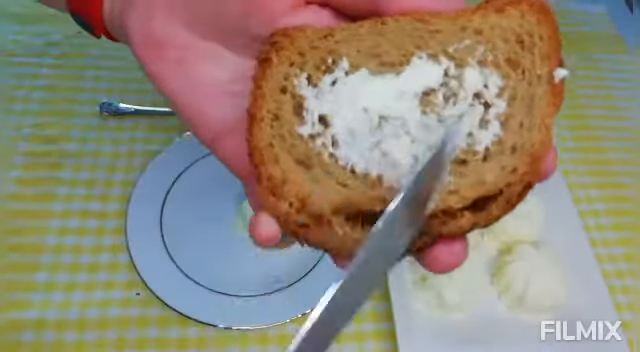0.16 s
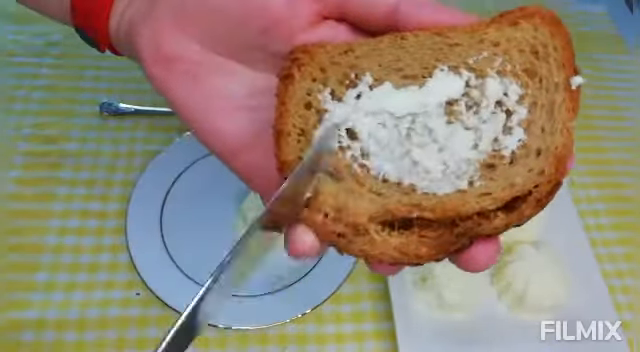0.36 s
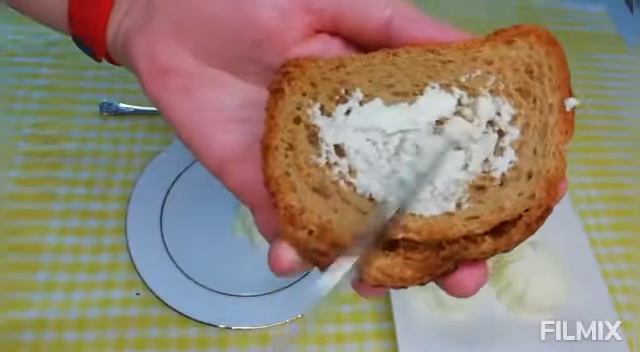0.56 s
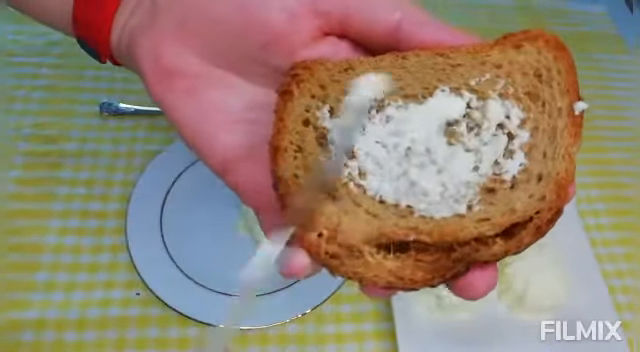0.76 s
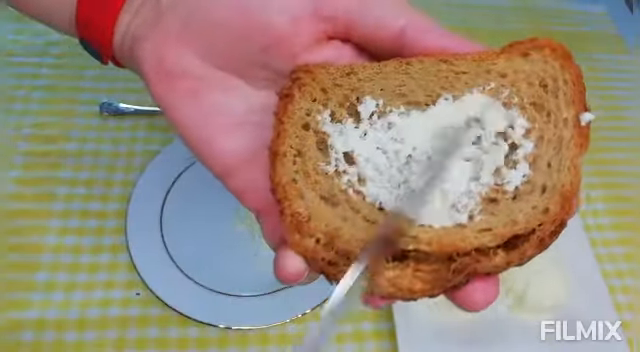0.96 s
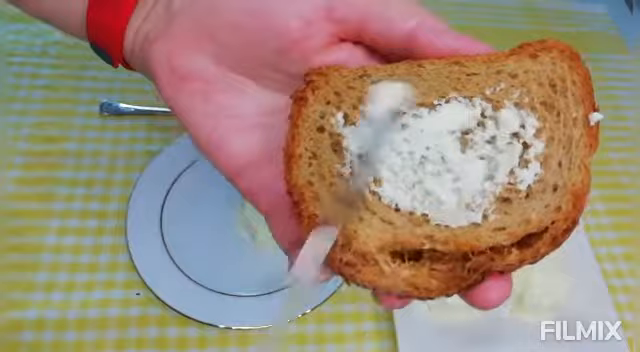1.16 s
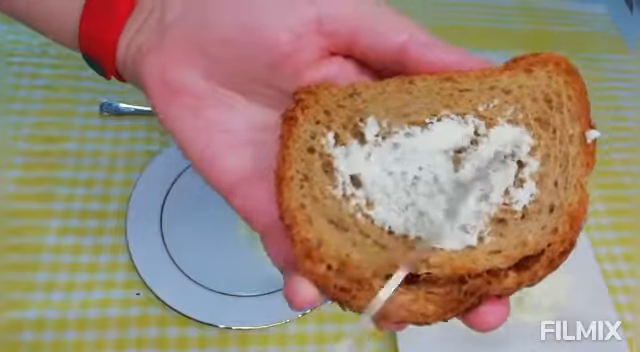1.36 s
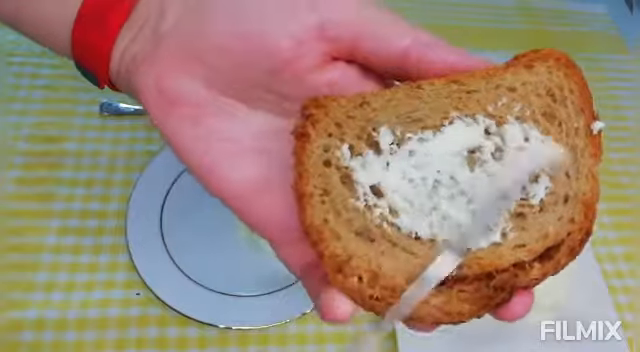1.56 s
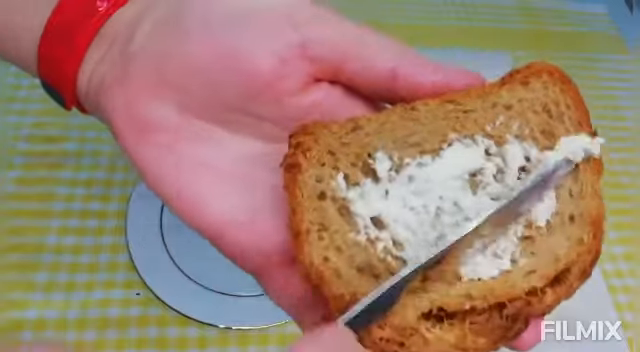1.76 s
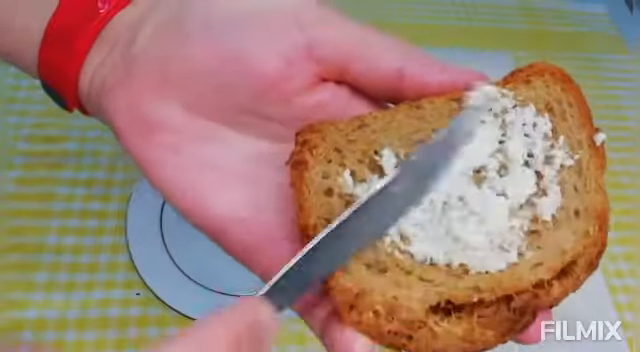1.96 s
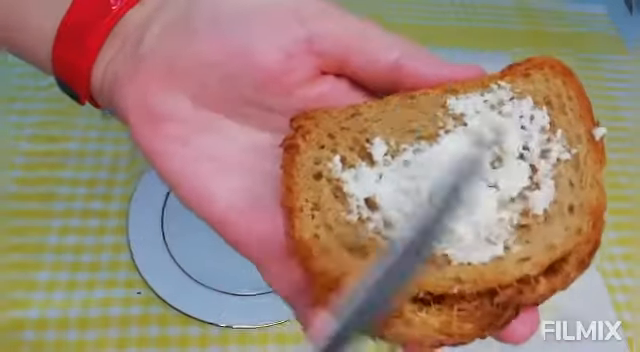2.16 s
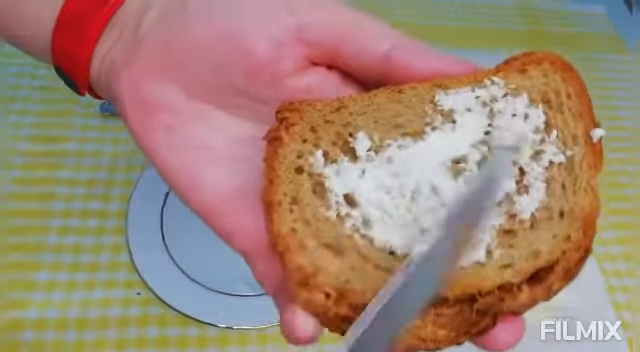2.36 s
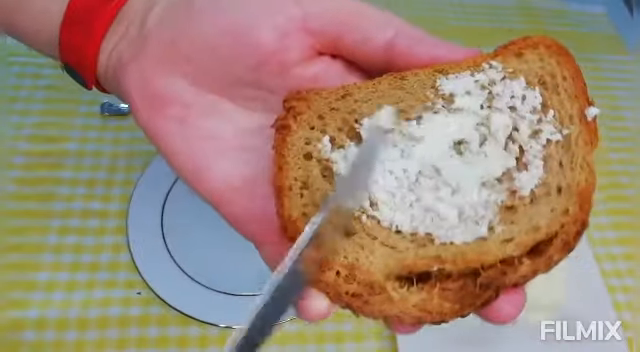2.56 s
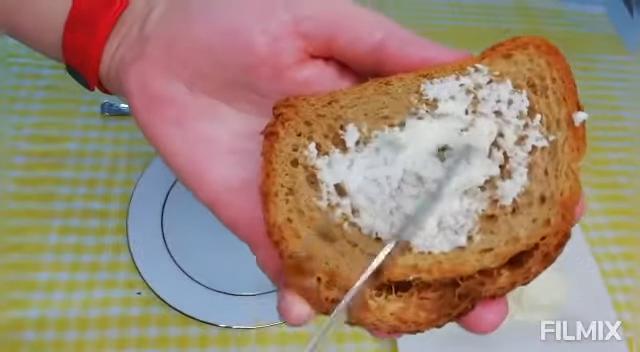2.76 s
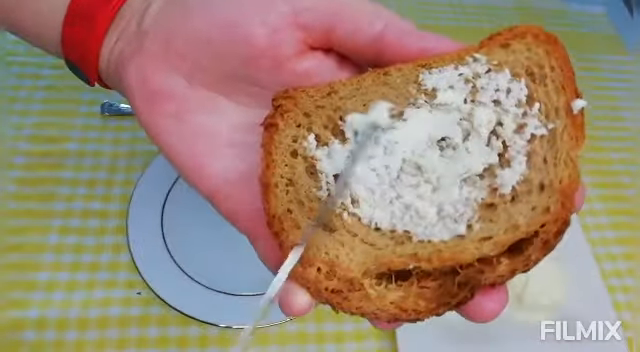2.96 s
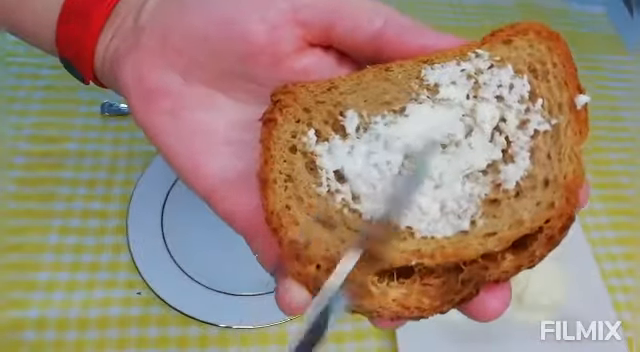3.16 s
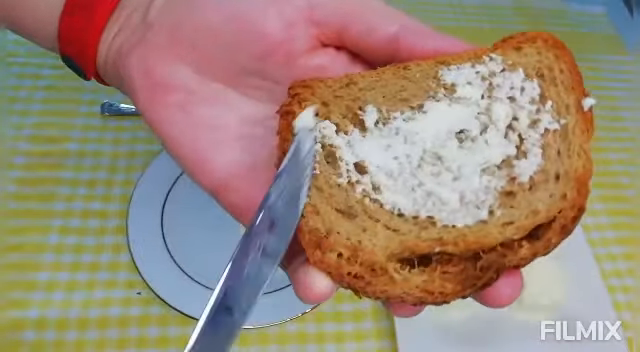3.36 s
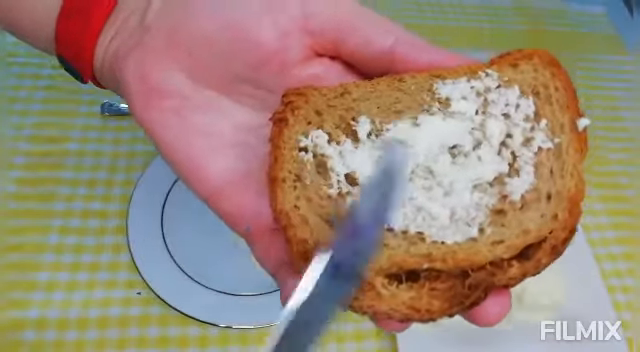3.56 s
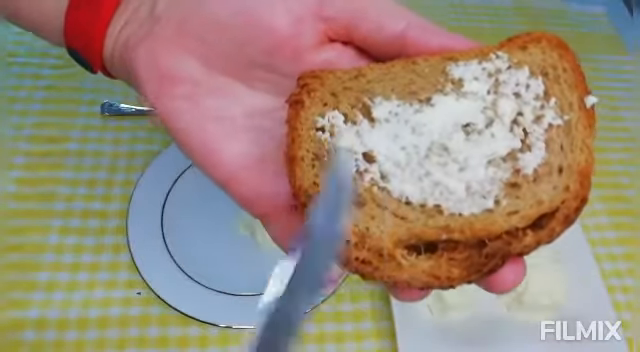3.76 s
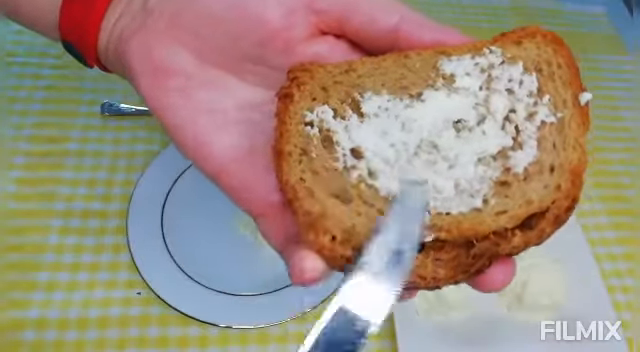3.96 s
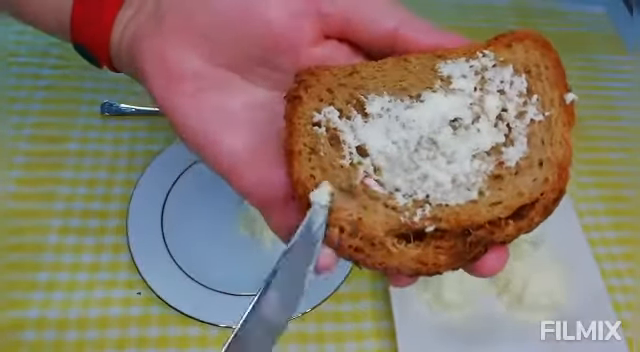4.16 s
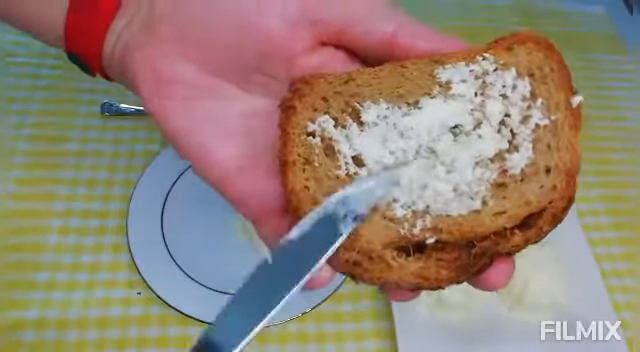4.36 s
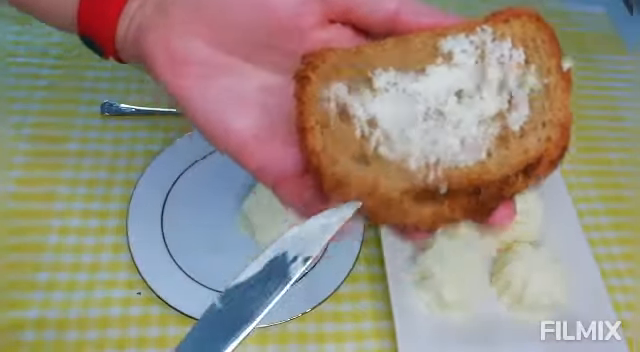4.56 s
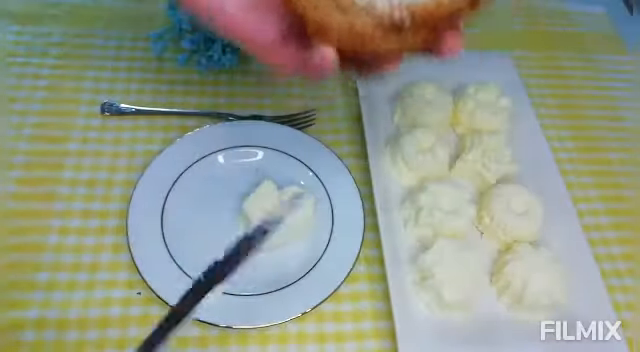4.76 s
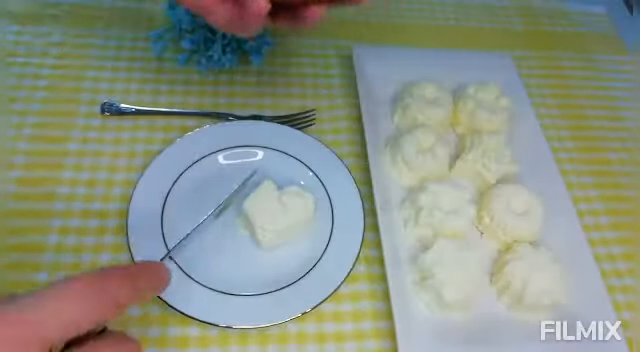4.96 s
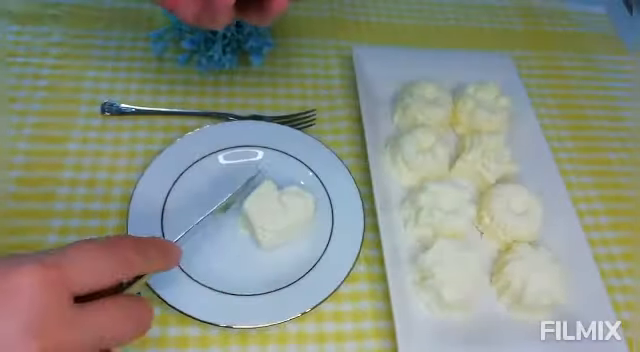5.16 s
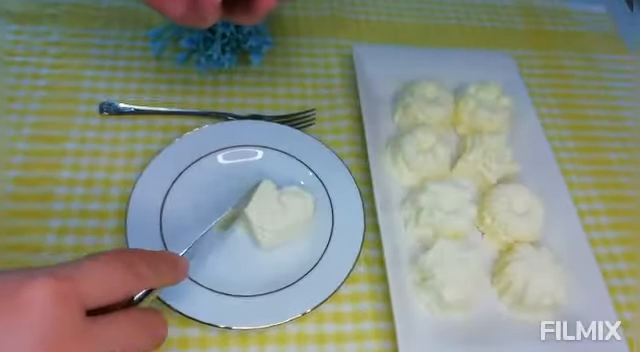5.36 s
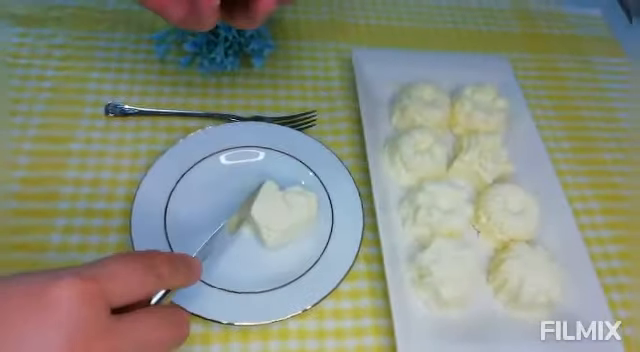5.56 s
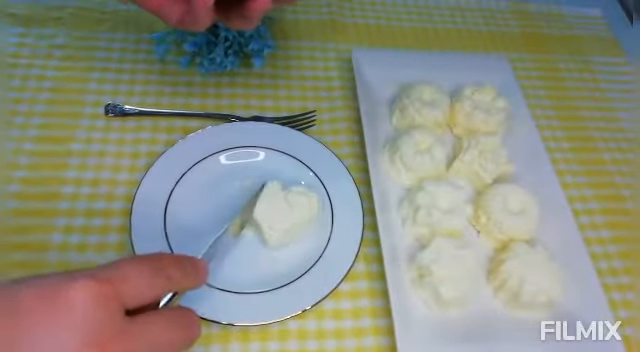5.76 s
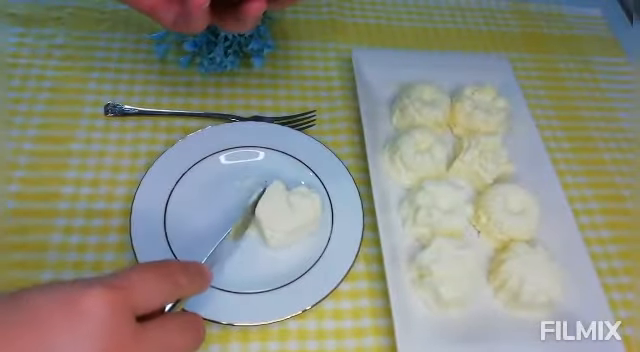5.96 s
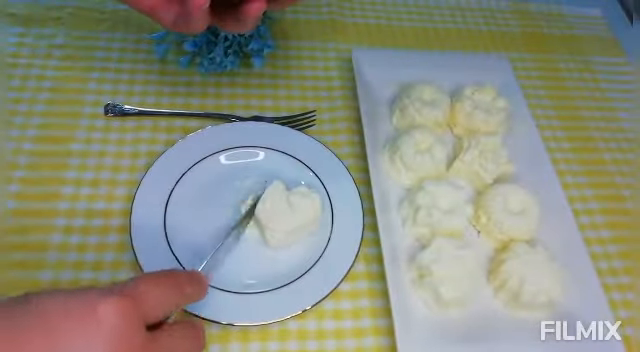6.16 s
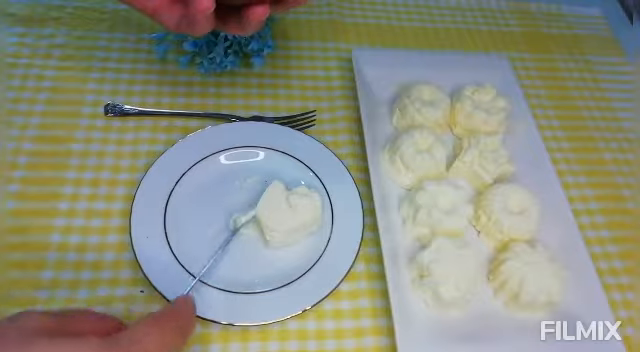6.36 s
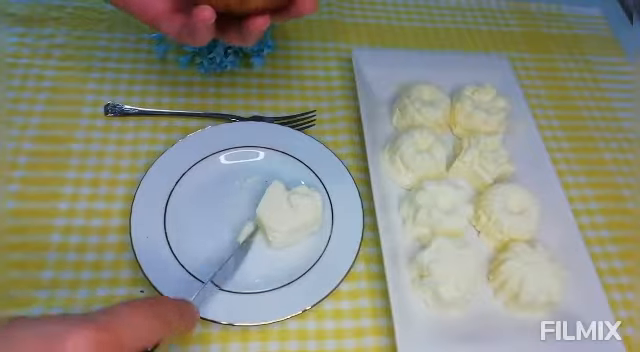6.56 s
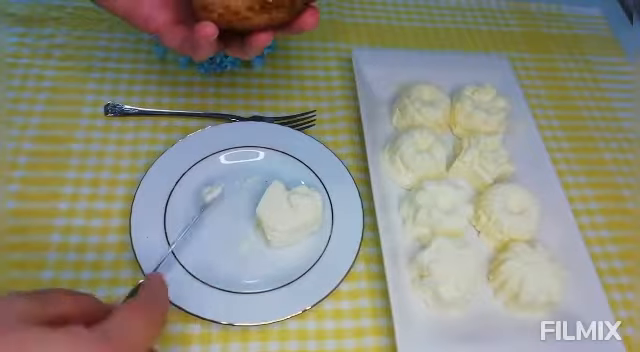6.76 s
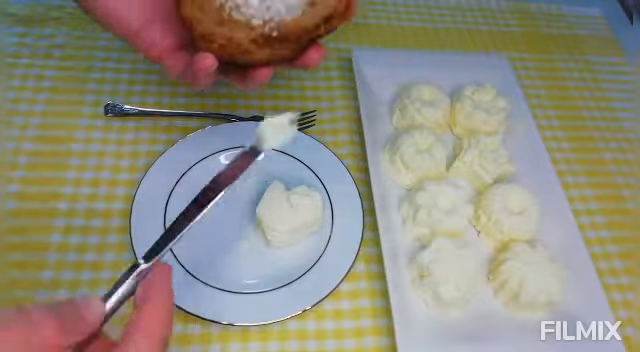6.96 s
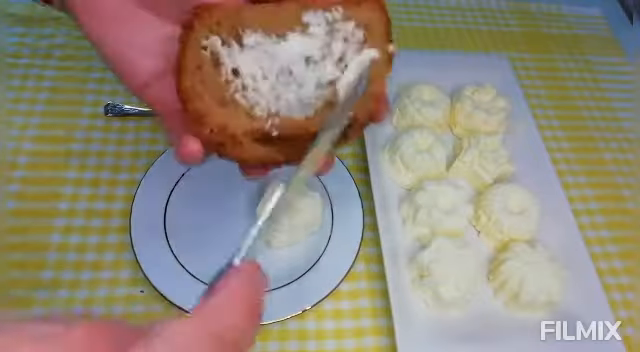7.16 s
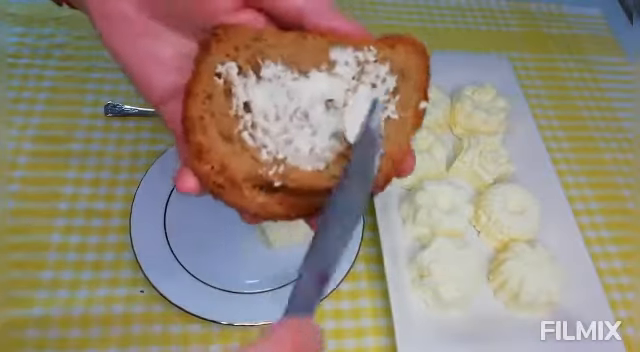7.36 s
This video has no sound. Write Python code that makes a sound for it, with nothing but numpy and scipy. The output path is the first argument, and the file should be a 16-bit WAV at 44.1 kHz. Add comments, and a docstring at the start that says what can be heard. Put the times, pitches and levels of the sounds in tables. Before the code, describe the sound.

A table knife scrapes butter over crisp toast, close to the microphone in a small, quiet kitchen. From the start until about 4.2 seconds, short strokes come two or three times a second, each a dry rasp full of bright crackles and tiny snapping crumbs. They vary in strength, with the strongest at about 1.1 seconds. Around 4.1 seconds the crust gives a small crunch, and the hand shifts its grip with a faint, deep rumble. From 4.4 to 4.6 seconds the blade ticks lightly as it is wiped on the crust. After a lull, the knife hits a china plate at about 6.2 seconds with one sharp, quickly damped clink, then slides very softly over the glaze at 6.3 and 6.7 seconds. Soft air noise and a faint, low appliance hum continue underneath until the end, a little after 7 seconds.

```python
"""A table knife scrapes butter over crisp toast held in the hand, in a small kitchen.
Each stroke breaks a stream of tiny crumbs, which crackle, rasp through the slice and make the blade ring.
The blade ticks as it is wiped on the crust, and the hand shifts its grip with a faint rumble.
Then the knife clinks on a china plate and slides on it twice. Soft air noise and the faint hum
of an appliance lie under it all."""
import sys
import numpy as np
from scipy import signal
from scipy.fft import rfft, irfft
from scipy.io import wavfile
from scipy.ndimage import uniform_filter1d, map_coordinates

SR = 44100
rng = np.random.default_rng(int(sys.argv[2]) if len(sys.argv) > 2 else 0)


def transcribe(u):
    """Save the signal u as a 16-bit wav file named by the first command-line argument.

    u: samples, shape (n,) or (channels, n), limited to [-1, 1]; the rate is SR.
    q: integer samples, one column per channel.
    """
    v = np.clip(np.atleast_2d(u).T, -1, 1)
    q = np.round(v * 32767).astype(np.int16)
    wavfile.write(sys.argv[1], SR, q)


N = 325899
TIME = np.arange(N) / SR

# the tone of the kitchen air (frequency [Hz], relative level [dB])
AIR_TONE = [(10, -24), (35, 4), (65, -2), (130, -9), (280, -12), (580, -20.5), (1100, -17.5), (2400, -27.5),
            (4000, -24), (6300, -29.5), (8100, -22.5), (9300, -24), (10100, -33.5), (15500, -41)]
# how alike the air sounds in both ears (frequency [Hz], likeness [0-1])
AIR_LIKENESS = [(60, 0.92), (130, 1), (290, 0.024), (640, 0), (15000, 0.045)]
# the steady notes of the appliance (frequency [Hz], level [dB])
HUM_NOTES = [(48.4, -69.5), (96.9, -71.5), (145.3, -82.5), (193.8, -74.5), (247.6, -78.5), (296.1, -101),
             (344.5, -80), (452.2, -83.5), (834.4, -85)]
# the hand shifts its grip (time [s], rise [s], fall [s], level [dB])
GRIP_SHIFTS = [(4.18, .1, 0.44, -55)]
# the knife slides on the plate, growing louder (time [s], length [s], relative level [dB])
PLATE_SLIDES = [(6.275, 0.036, -57), (6.688, 0.074, -56)]
# the knife hits the plate (time [s], relative level [dB])
PLATE_HITS = [(6.155, -10.5)]
# the tone of steel on china, breaking crumbs and the airy slice (frequency [Hz], relative level [dB])
CHINA_TONE = [(100, -38.5), (230, -15.5), (480, -48.5), (750, -20), (1200, -44), (2600, -13.5), (3700, -20),
              (4200, -1), (5000, 1), (5600, -13), (6900, -22.5), (7300, 6.5), (8500, -10), (11500, -20.5),
              (15500, -37.5)]
CRUMB_TONE = [(1500, -24), (3200, -11), (4400, -6), (5700, -9), (6600, -2.5), (7600, -4), (8400, 2),
              (10100, -1.5), (11000, -13), (12100, -14.5), (12800, -13), (13900, -24.5), (15400, -19),
              (16200, -27)]
SLICE_TONE = [(150, -29), (400, -14), (650, -18), (1000, -10.5), (1500, -1.5), (1800, -1), (2230, 6.5),
              (2750, 0), (4000, -19.5), (8000, -62)]
# the notes that plate and blade ring with (frequency [Hz], relative level [dB], time to fade 60 dB [s])
PLATE_NOTES = [(232.4, -30, 0.52), (696, -36.5, 0.096), (2800, -19.5, 0.39), (4450, -3, 0.094),
               (4600, -15, 0.078), (4700, -16.5, 0.089), (5050, -7.5, 0.054), (5120, -18.5, 0.12),
               (5980, -9.5, 0.074), (7300, -21, .08), (7660, -20.5, .1), (8400, -14.5, 0.13),
               (10400, -15, 0.12)]
BLADE_NOTES = [(2090, -43, 0.023), (4470, -23.5, 0.05), (6590, -11, 0.034), (7240, -11.5, 0.022),
               (7780, -16, 0.042), (7950, -11, 0.032), (8290, 1, 0.021), (8970, -6.5, 0.024),
               (9250, -33, .05), (10200, -6.5, 0.012), (12870, -4, 0.0047)]
# the thick crust caves in (time [s], relative level [dB])
CRUST_BREAKS = [(4.092, -41.5), (4.126, -49), (4.139, -36), (4.156, -34), (4.582, -57)]
# the blade catches on the crust and springs free (time [s], relative level [dB])
BLADE_CATCHES = [(4.0954, -23), (4.4355, -40.5), (4.447, -45), (4.483, -36.5), (4.5, -37), (4.5265, -33.5),
                 (4.559, -25), (4.579, -21.5), (4.5923, -28), (4.6137, -35.5)]
# larger crumbs snap (time [s], relative level [dB])
CRUMB_SNAPS = [(0.032, -36), (0.064, -27.5), (0.2733, -35.5), (0.315, -27), (0.617, -29.5), (0.626, -25),
               (0.6746, -22.5), (1.0925, -19.5), (1.1088, -15), (1.1224, -28), (1.149, -35), (1.4654, -46),
               (1.513, -26.5), (1.8896, -35.5), (1.957, -29.5), (1.9807, -24), (2.1113, -18), (2.1352, -28),
               (2.382, -36), (2.505, -30), (2.5755, -25), (2.8795, -32.5), (2.9034, -29), (2.975, -35.5),
               (3.72, -33), (3.7315, -31), (3.98, -34), (4.0427, -40), (4.0953, -22), (4.14, -21),
               (4.165, -31), (4.1868, -32)]
# the blade lands, glides lightly, presses down, eases off and lifts; levels are relative
# (time [s], glide [s], press [s], gliding crumbs [dB], gliding rasp [dB], pressed crumbs [dB],
#  pressed rasp [dB], drop while easing off [dB], high sparkle compared with the crumbs [dB])
KNIFE_STROKES = [ (0.0, 0.015, 0.039, -45.5, -59.5, -53, -55, 6.5, -28),
                 (0.271, 0.042, 0.1, -50.5, -60, -37.5, -46.5, 5.5, -24),
                 (0.618, 0.047, 0.085, -47.5, -57, -38, -40.5, 12.5, -26),
                 (1.034, 0.0099, .006, -57, -62.5, -47, -69, 15, -20),
                 (1.058, .038, .064, -45, -49.5, -29.5, -38, 18, -12),
                 (1.44, 0.011, 0.015, -59.5, -71, -48.5, -53.5, 6, -25),
                 (1.789, 0.12, 0.028, -66.5, -74.5, -46, -58, 12, -15),
                 (1.956, .11, .006, -46, -65, -41, -65, -2, -10),
                 (2.076, 0.027, 0.019, -51, -56, -39, -47, 3.5, -16),
                 (2.385, 0.027, 0.062, -50.5, -65.5, -44.5, -53.5, 6, -10),
                 (2.501, .048, 0.041, -41.5, -52, -37.5, -48, 9, -8),
                 (2.866, 0.0032, 0.032, -55, -64, -41.5, -40.5, 13.5, -22),
                 (2.925, 0.048, 0.02, -64.5, -66, -46.5, -54.5, 10.5, -21),
                 (3.245, .012, 0.1, -58, -62, -48.5, -47.5, 3, -20),
                 (3.382, 0.011, 0.033, -43.5, -51.5, -42.5, -53, 2.5, -16),
                 (3.69, 0.029, 0.069, -63.5, -71, -39.5, -46, 18, -24),
                 (3.982, 0.036, .006, -63.5, -70.5, -59, -56, 7, -14),
                 (4.038, 0.098, 0.054, -48.5, -56.5, -36, -54.5, 5, 1),
                 (4.42, 0.12, 0.055, -58, -57.5, -56, -70, -10, -19), ]
# where the blade is, as the ears hear it (time [s], left minus right [dB], right ear's delay [s])
BLADE_PLACE = [(.35, 2.5, 0.00012), (1.1, 1.8, .0001), (1.5, -1, 0.000067), (2.05, 0.5, .000062),
               (2.9, 1, 0.000089), (3.35, 3, 0.00015), (3.75, 3, 0.00014), (4.15, 4, 0.000097)]
# how each pitch from the toast leans to one side (frequency [Hz], left minus right [dB])
TOAST_BALANCE = [(300, -2), (650, 3.5), (1000, 7), (1500, -5), (2400, -1), (4500, -2), (6500, -4),
                 (8300, -2.5), (10000, 5), (15000, 3.5)]

AIR_DB, ROOM_FADE_S, CUTOFF_HZ = -64.5, 0.21, 16000
LAND_S, BITE_S, LIFT_S = 0.013, 0.011, 0.049   # the blade meets the toast, sinks in, comes away
GLIDE_SWELL_DB = 1   # pressure builds during the glide
CONTACT_RANGE_DB, GRIP_RANGE_DB = 37.5, 15   # from faintest to full, for blade and hand
SLIDE_SWELL_DB, SLIDE_START_S, SLIDE_STOP_S = 10, .01, .05


def from_db(db):
    """Turn decibels into a number to multiply a sound by."""
    return 10 ** (np.asarray(db) / 20)


def rms_one(x):
    """Scale a signal so that its average strength (rms) is 1."""
    return x / np.sqrt(np.mean(x ** 2) + 1e-20)


def at_hz(points, hz):
    """Read between the rows of a frequency table, giving every octave equal room."""
    known_hz, values = np.transpose(points)
    return np.interp(np.log(np.maximum(hz, 1)), np.log(known_hz), values)


def drift(per_s):
    """A random wobble of strength 1 that takes a new course `per_s` times a second."""
    return rms_one(np.interp(TIME * per_s, np.arange(N), rng.standard_normal(N)))


def envelope(start_s, lengths_s, levels_db):
    """A volume curve that moves from level to level in stages, silent before and after."""
    corners_s = start_s + np.cumsum([0, *np.abs(lengths_s)])
    return from_db(np.interp(TIME, corners_s, levels_db, left=-np.inf, right=-np.inf))


def fade(fade_s):
    """A curve that dies away by 60 dB in `fade_s` seconds."""
    return from_db(-60 * np.arange(int(fade_s * SR)) / (fade_s * SR))


def clicks_at(events):
    """One click for each (time [s], level [dB]) row."""
    out = np.zeros(N)
    for time_s, level_db in events:
        out[round(time_s * SR)] += from_db(level_db)
    return out


def band(x, low_hz, high_hz):
    """Keep the sound between two frequencies."""
    return signal.sosfilt(signal.butter(2, [low_hz, high_hz], "band", fs=SR, output="sos"), x)


def convolve(x, response):
    """Pass a sound through something that answers a single click with `response`."""
    return signal.oaconvolve(x, response)[:N]


def response_of(tone, size=2048):
    """The quickest answer to a click that has the given tone (a minimum-phase filter)."""
    cepstrum = irfft(np.log(from_db(at_hz(tone, np.fft.rfftfreq(size, 1 / SR)))))
    cepstrum[1:size // 2] *= 2
    cepstrum[size // 2 + 1:] = 0   # nothing sounds before the click
    return irfft(np.exp(rfft(cepstrum)))


def colour(x, tone):
    """Give a sound a tone; white noise would keep its strength."""
    response = response_of(tone)
    return convolve(x, response / np.linalg.norm(response))


def ring(x, notes):
    """Set an object's fading notes ringing; neighbouring notes swing opposite ways."""
    out = np.zeros(N)
    for k, (hz, level_db, fade_s) in enumerate(notes):
        decay = np.exp(-np.log(1000) / (fade_s * SR))
        angle = 2 * np.pi * hz / SR
        note = signal.lfilter([0, np.sin(angle)], [1, -2 * decay * np.cos(angle), decay ** 2], x + 1e-18)
        out += (-1) ** k * from_db(level_db) * note
    return out


def crunch(clicks, fade_s):
    """Turn each click into a short, fading burst of tiny contacts."""
    return convolve(clicks, fade(fade_s)) * rng.choice([-1, 1], N)


def tiny_cracks(per_s, spread_db, clump_db):
    """Random clicks that come in clumps, a few large among many small, at a steady overall strength."""
    sizes = from_db(spread_db * np.minimum(rng.exponential(1, N), 4) + clump_db * drift(350))
    clicks = sizes * (rng.random(N) < per_s / SR) * rng.choice([-1, 1], N)
    return clicks / np.sqrt(uniform_filter1d(clicks ** 2, size=700) + 1e-9)   # the hand presses evenly


def echoes(x, level_db, fade_s, delay_s):
    """A blur of echoes that die away, a little duller than the sound itself."""
    decay = fade(fade_s)
    dull_noise = signal.lfilter([1, .45], [1], rng.standard_normal(SR))
    tail = dull_noise[:len(decay)] * decay
    response = np.pad(tail / np.linalg.norm(tail), (int(delay_s * SR), 0))
    return from_db(level_db) * convolve(x, response)


def kitchen(x, right_lag_s, early_db, early_fade_s, room_db, spot_count=4):
    """Each ear hears the sound itself, quick echoes off table and hands, and then the room."""
    spots = np.array([drift(60) for _ in range(spot_count)])   # echoes shift with the point of contact
    spots = spots / np.linalg.norm(spots, axis=0)
    delayed = map_coordinates(x, [(TIME - right_lag_s) * SR], order=5)
    ears = []
    for direct in (x, delayed):
        early = sum(echoes(x * share, early_db, early_fade_s, delay_s=.0003) for share in spots)
        ears.append(direct + early + echoes(x, room_db, ROOM_FADE_S, delay_s=.005))
    return np.array(ears)


def room_air():
    """Soft air noise whose low notes are alike in both ears."""
    hz = np.fft.rfftfreq(N, 1 / SR)
    alike = np.clip(at_hz(AIR_LIKENESS, hz), -1, 1)
    shared, side = rfft(rng.standard_normal((2, N))) * from_db(at_hz(AIR_TONE, hz))
    side = side * np.sqrt((1 - alike) / (1 + alike + 1e-6))
    air = irfft(np.array([shared + side, shared - side]), N)
    return from_db(AIR_DB) * air / np.std(irfft(shared, N))


def appliance_hum():
    """An appliance hums with a few low, slightly wavering notes."""
    return sum(np.sqrt(2) * from_db(level_db) * np.sin(2 * np.pi * hz * TIME + 0.55 * drift(4))
               for hz, level_db in HUM_NOTES)


def grip_rumble():
    """The shifting hand makes a faint, deep rumble."""
    volume = sum(envelope(time_s, [rise_s, fall_s], [db - GRIP_RANGE_DB, db, db - GRIP_RANGE_DB])
                 for time_s, rise_s, fall_s, db in GRIP_SHIFTS)
    return rms_one(band(rng.standard_normal(N), 29, 67)) * volume


def plate_slides():
    """The buttered edge rubs softly over the plate's glaze, growing louder until it stops."""
    friction = tiny_cracks(per_s=3800, spread_db=5.5, clump_db=2.0)
    rub = rms_one(colour(friction, CHINA_TONE)) + from_db(-8) * rms_one(ring(friction, PLATE_NOTES))
    volume = np.zeros(N)
    for time_s, length_s, db in PLATE_SLIDES:
        levels_db = [db - CONTACT_RANGE_DB, db - SLIDE_SWELL_DB, db, db - CONTACT_RANGE_DB]
        volume += envelope(time_s - SLIDE_START_S, [SLIDE_START_S, length_s, SLIDE_STOP_S], levels_db)
    return rub * volume


def plate_clink():
    """Steel hits china with a hard crack; the plate rings, muffled by butter and tablecloth."""
    clicks = clicks_at(PLATE_HITS)
    crack = colour(crunch(clicks, fade_s=0.0066), CHINA_TONE)
    return crack + from_db(-16.5) * ring(clicks, PLATE_NOTES)


def crust_crunch():
    """The thick crust caves in with a low crunch."""
    return band(crunch(clicks_at(CRUST_BREAKS), fade_s=0.023), 366, 960)


def blade_ticks():
    """The blade springs off the crust with a short rasp and a brief ring of steel."""
    clicks = clicks_at(BLADE_CATCHES)
    rasp = colour(crunch(clicks, fade_s=0.015), CRUMB_TONE)
    return ring(clicks, BLADE_NOTES) + from_db(-5.5) * rasp


def stroke(time_s, glide_s, press_s, glide_db, press_db, easing_db):
    """The volume of one stroke: the blade lands, glides, bites in, eases off and lifts."""
    first_db, last_db = glide_db - GLIDE_SWELL_DB / 2, press_db - easing_db
    levels_db = [first_db - CONTACT_RANGE_DB, first_db, first_db + GLIDE_SWELL_DB,
                 press_db, last_db, last_db - CONTACT_RANGE_DB]
    return envelope(time_s - LAND_S, [LAND_S, glide_s, BITE_S, press_s, LIFT_S], levels_db)


def spreading():
    """Breaking crumbs crackle, sound through the airy slice and set the blade ringing."""
    crumb_volume, sparkle_volume, pressure = np.zeros((3, N))
    for (time_s, glide_s, press_s, crumb_glide_db, rasp_glide_db,
         crumb_press_db, rasp_press_db, easing_db, sparkle_db) in KNIFE_STROKES:
        volume = stroke(time_s, glide_s, press_s, crumb_glide_db, crumb_press_db, easing_db)
        crumb_volume += volume
        sparkle_volume += from_db(sparkle_db) * volume
        pressure += stroke(time_s, glide_s, press_s, rasp_glide_db, rasp_press_db, easing_db)
    breaks = tiny_cracks(per_s=6500, spread_db=3.0, clump_db=3.5)   # clumps: the blade crosses holes
    snaps = crunch(clicks_at(CRUMB_SNAPS), fade_s=0.0021)
    cracks = breaks * crumb_volume + snaps
    crackle = colour(cracks, CRUMB_TONE) + from_db(-39) * ring(cracks, BLADE_NOTES)
    sparkle = band(breaks * sparkle_volume + from_db(-22) * snaps, 11900, 13200)
    rasp = colour(breaks * pressure + from_db(-15) * snaps, SLICE_TONE)
    # the slice shudders in the hand; the soft palm keeps this from growing much with pressure
    shudder = from_db(-45.5) * pressure ** 0.5 * rms_one(band(breaks, 101, 324))
    return crackle + sparkle + rasp + shudder


def scene():
    """Mix the toast held close by, the plate on the table below and the quiet kitchen, in stereo."""
    times_s, leans_db, lags_s = np.transpose(BLADE_PLACE)
    toast = kitchen(spreading() + blade_ticks() + crust_crunch(), np.interp(TIME, times_s, lags_s),
                    early_db=-1.0, early_fade_s=0.015, room_db=-10.5)
    for ear, share in enumerate((.5, -.5)):   # left, right
        ear_tone = [(hz, share * db) for hz, db in TOAST_BALANCE]
        toast[ear] = convolve(toast[ear], response_of(ear_tone))
    # every crumb throws its sound in a direction of its own
    lean_db = np.interp(TIME, times_s, leans_db) + 4.4 * drift(500)
    toast *= from_db([lean_db / 2, -lean_db / 2])
    plate = kitchen(plate_clink() + plate_slides(), right_lag_s=0.00015,
                    early_db=-2.0, early_fade_s=0.022, room_db=-8.0)
    plate *= from_db([[-1.3], [1.3]])   # a little louder on the right
    return toast + plate + grip_rumble() + room_air() + appliance_hum()


def record(dry):
    """Cut away the very highest treble steeply."""
    return signal.sosfilt(signal.ellip(10, .1, 80, CUTOFF_HZ, fs=SR, output="sos"), dry)


dry = scene()
out = record(dry)
transcribe(out)
```